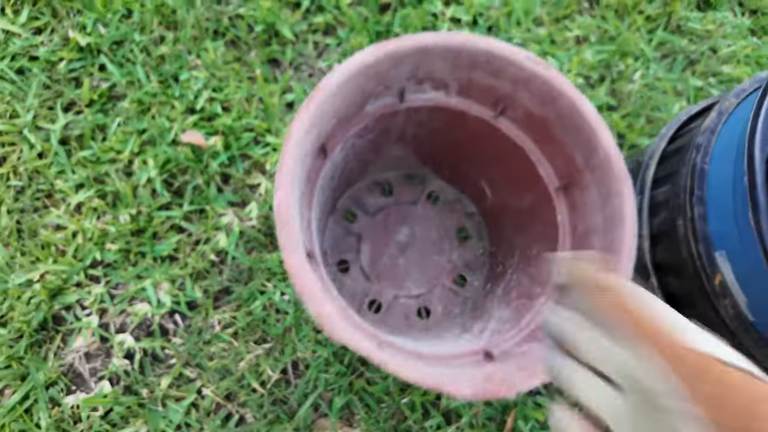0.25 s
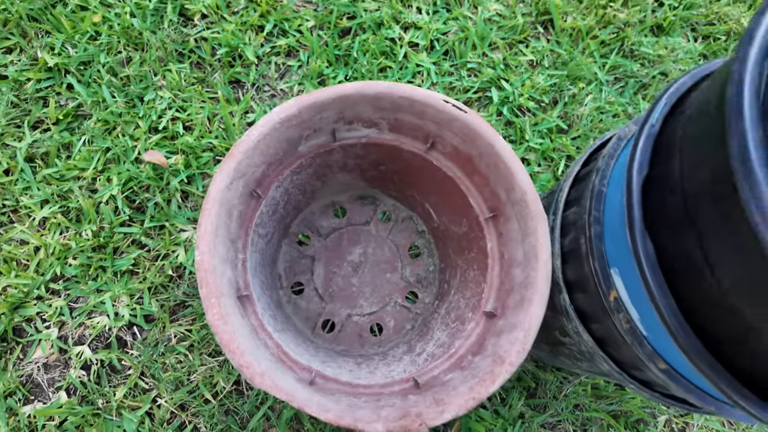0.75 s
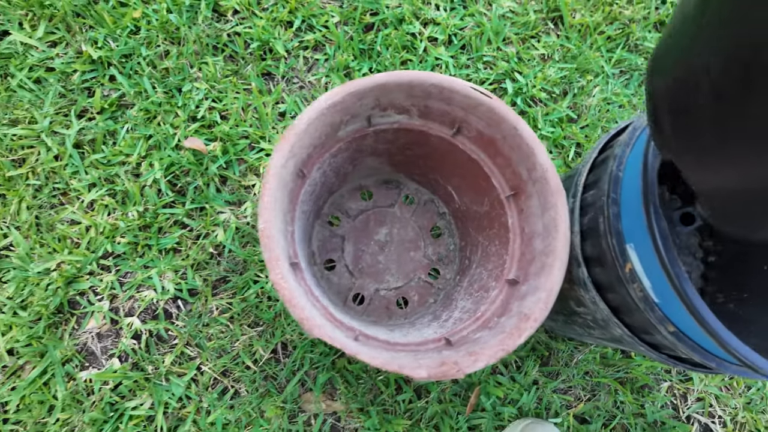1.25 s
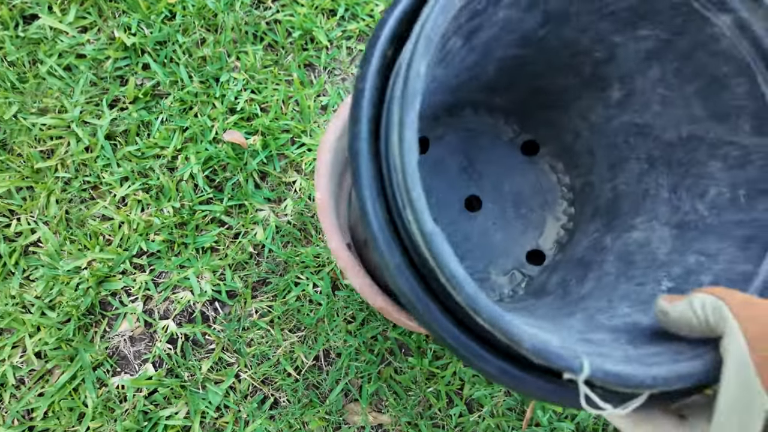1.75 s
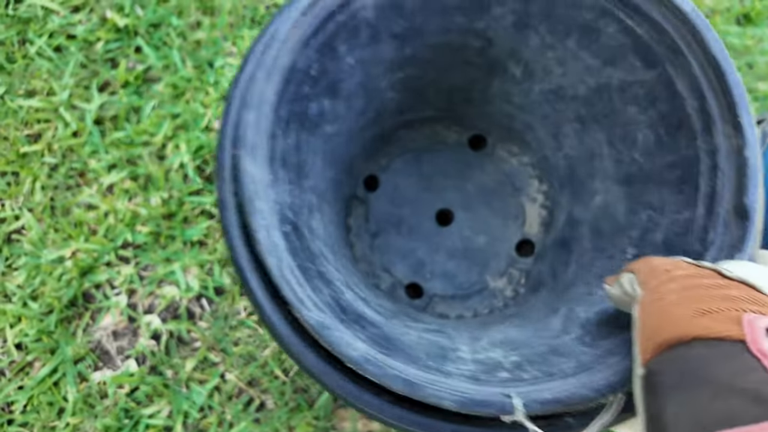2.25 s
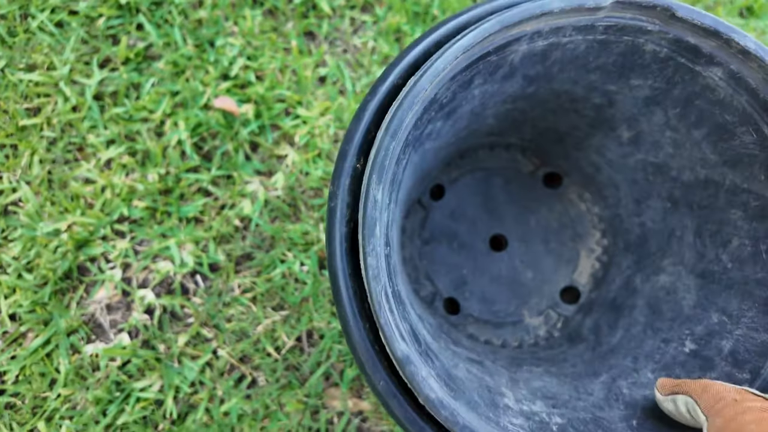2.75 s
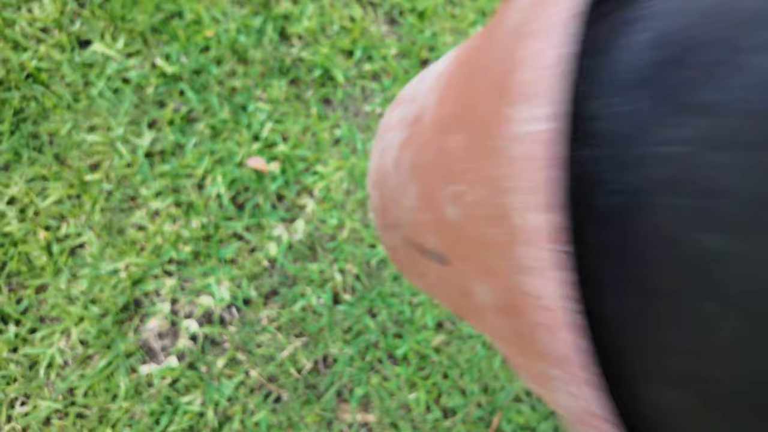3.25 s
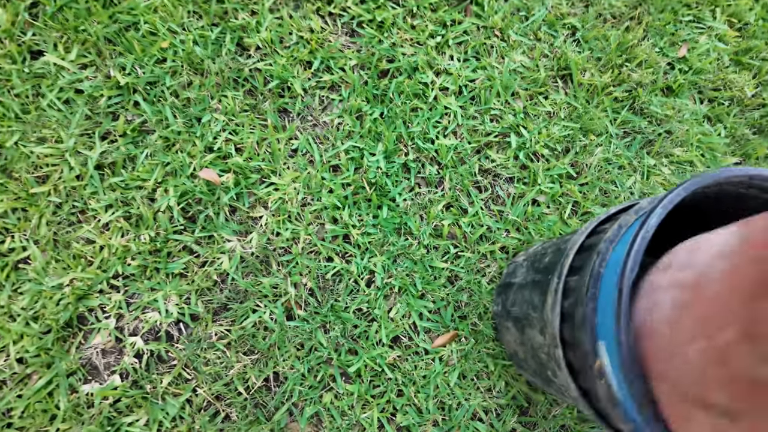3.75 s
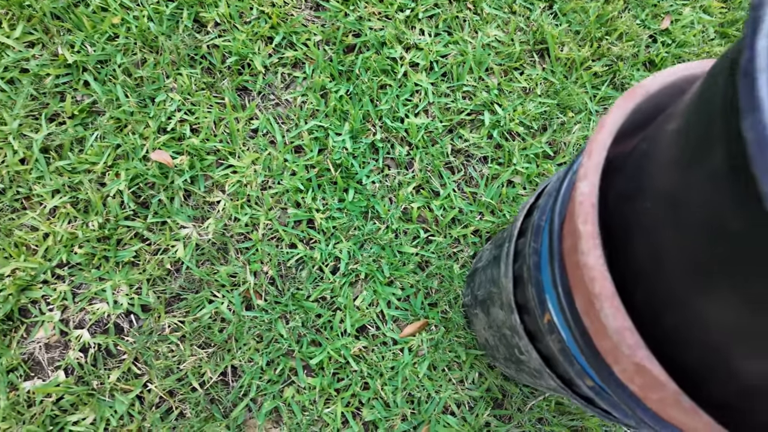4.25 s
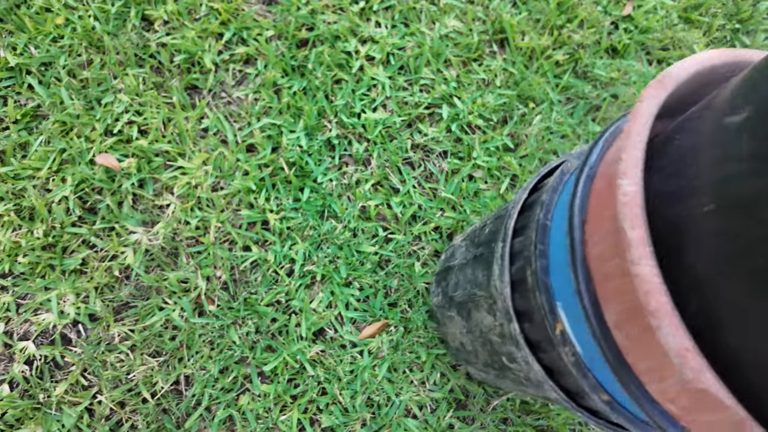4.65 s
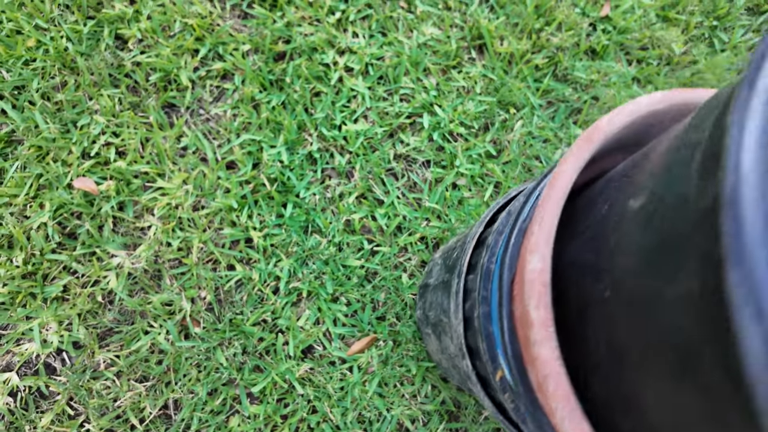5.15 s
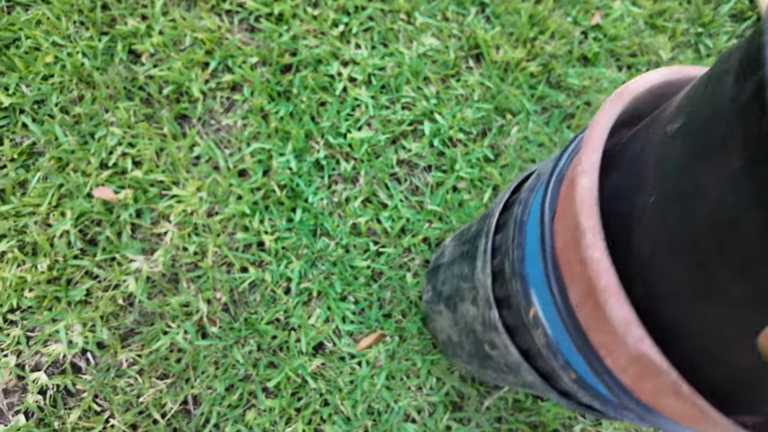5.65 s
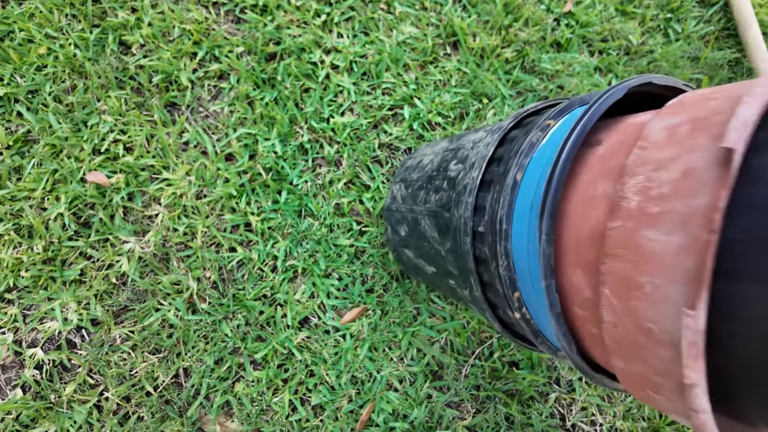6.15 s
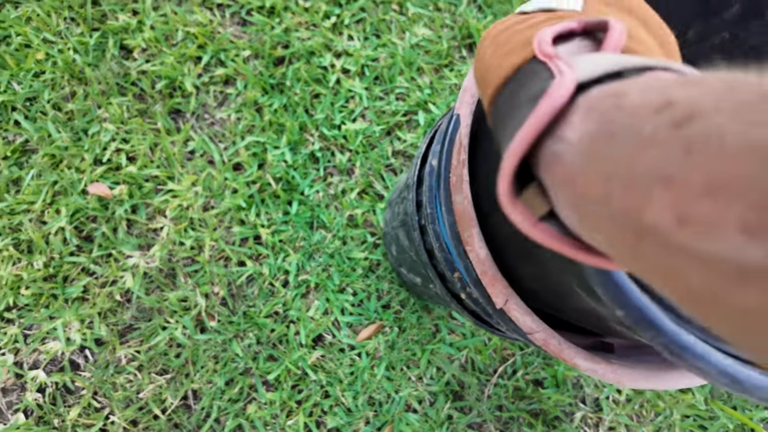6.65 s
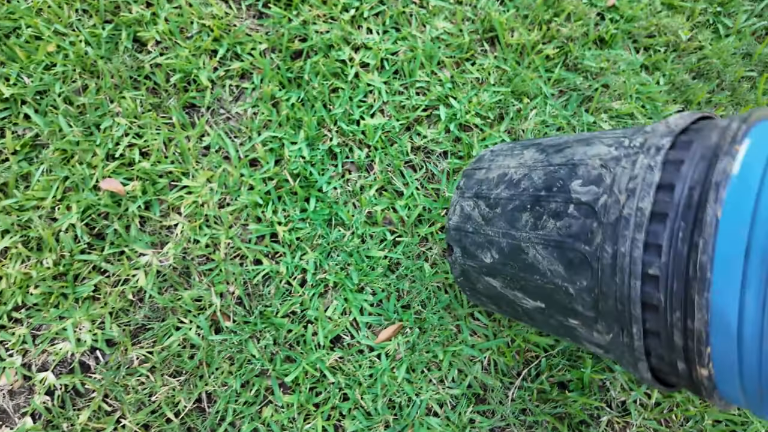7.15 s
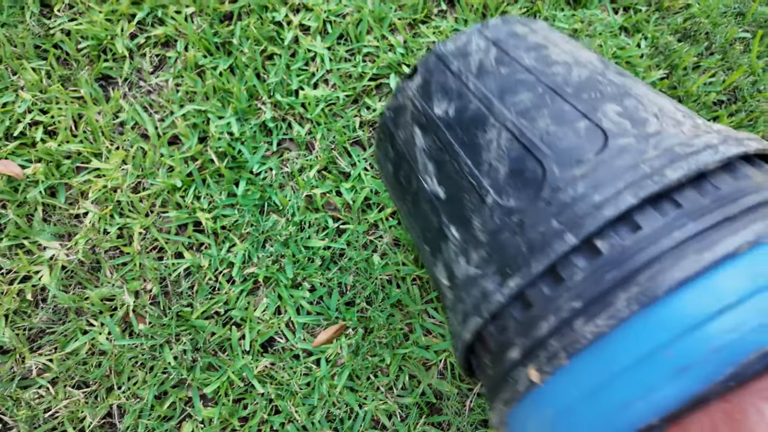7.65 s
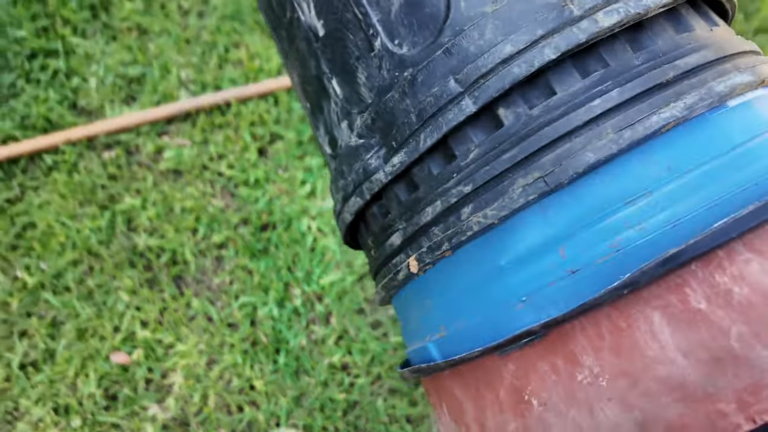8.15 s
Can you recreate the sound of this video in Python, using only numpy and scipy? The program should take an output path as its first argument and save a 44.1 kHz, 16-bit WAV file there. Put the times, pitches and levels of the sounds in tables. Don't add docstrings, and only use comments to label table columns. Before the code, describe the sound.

Close, hollow plastic clatter and gritty rubbing of flowerpots being stacked outdoors, then low wind thumps and light rim taps over a quiet hum.

```python
import sys
import numpy as np
from scipy import signal
from scipy.io import wavfile
from scipy.ndimage import uniform_filter1d

SR = 44100
rng = np.random.default_rng(int(sys.argv[2]) if len(sys.argv) > 2 else 0)


def wav_record(signal):
    frames = np.transpose(np.atleast_2d(signal))
    bounded = np.clip(frames, -1, 1)
    quanta = np.round(bounded * 32767).astype(np.int16)
    wavfile.write(sys.argv[1], SR, quanta)


def amplitude_ratio(level_db):
    exponent = np.asarray(level_db, float) / 20
    return 10 ** exponent


N = 370873
TIME = np.arange(N) / SR

# frequency in Hz, level in dB per Hz.
WALL_COLOUR = [(350, -11.5), (512, -6.5), (824, -2.5), (1060, -1.5), (1330, 0.5), (1970, -1), (3600, -7.5),
               (5300, -14), (7500, -21), (10500, -20), (15500, -26.5)]
BAND_EDGES_HZ = (400, 1000, 2300, 6000)
# time in seconds, rub in dB, dust hiss in dB re rub.
HANDLING = [(0, -56.5, -15.5), (.75, -60, -7), (1.34, -58.5, -11), (1.65, -64, -20), (2.12, -51, -12),
            (2.86, -64, -24), (3.5, -65.5, -26), (4.1, -60.5, 5), (4.36, -61, -5), (4.53, -59.5, -7.5),
            (5.2, -64.5, 1), (5.6, -59, -3), (5.9, -59.5, -8), (6.2, -56.5, -2), (6.75, -51, -11),
            (6.93, -74, 5), (7.3, -68, -8), (8.41, -58.5, 1.5)]
# start in seconds, length in seconds, first rub in dB,
# last rub in dB, dust hiss in dB re rub.
SLIDES = [(0.197, 0.032, -34, -40.5, -9.5), (0.808, 0.1, -44.5, -38, -5.5), (1.094, 0.079, -36, -40.5, -5),
          (1.41, 0.15, -55, -53, -5), (1.797, 0.071, -26, -38.5, -1.5), (1.977, 0.094, -46.5, -52, -5),
          (2.219, 0.018, -33, -34, -7), (2.264, 0.11, -39, -43, -6), (0.255, 0.068, -51.5, -52, -5.5),
          (0.353, 0.088, -49.5, -51.5, -7.5), (2.485, 0.076, -48, -51, -4.5),
          (2.683, 0.026, -46, -40.5, -12), (3.792, 0.022, -50.5, -50, -9), (7.556, 0.19, -58.5, -53, -2.5),
          (2.788, 0.049, -38.5, -49.5, -12), (2.913, 0.03, -54, -57, -19), (2.982, 0.022, -43.5, -42, -12),
          (3.602, 0.17, -59, -51, -7.5), (3.939, 0.048, -22.5, -28.5, -6.5), (3.957, 0.079, -36, -41, -4),
          (4.06, 0.11, -52, -53.5, -2.5), (4.26, 0.072, -56, -54, -5.5), (4.402, 0.077, -53.5, -47.5, -5.5),
          (4.864, 0.073, -61.5, -54.5, 3), (5.056, 0.047, -60.5, -56, -36), (5.262, 0.036, -44, -43, -6),
          (5.314, 0.025, -29.5, -36, -8.5), (5.365, 0.2, -46.5, -59.5, -7), (6, .14, -36.5, -41, -3.5),
          (6.508, 0.125, -40.5, -46, -2.5)]
# start in seconds, length in seconds, first rub in dB,
# last rub in dB, dust hiss in dB re rub.
SCUFFS = [(0.927, 0.08, -37, -35.5, -5.5), (1.016, 0.026, -36, -37, -7), (1.063, .02, -41, -50, 2),
          (7.778, 0.027, -46, -49, -16), (1.19, 0.014, -47, -43, -17), (1.697, 0.033, -24.5, -26, -11),
          (1.823, 0.041, -35.5, -35.5, 5), (2.714, 0.066, -29, -30.5, -10.5), (2.956, 0.02, -50, -48, -12),
          (3.841, 0.021, -28, -33, -9.5), (3.891, 0.019, -27.5, -22, 1.5), (6.263, 0.013, -33, -37, -2),
          (6.282, .02, -43, -43, -3), (6.299, 0.022, -39, -34.5, 0), (6.34, 0.034, -48, -48, -24)]
# start in seconds, rub in dB,
# scrape in seconds to fade, dust hiss in dB re rub.
JOLTS = [(0.317, -37.5, 0, -9), (0.568, -43, 0.24, -11.5), (1.227, -44.5, -0.2, -20),
         (1.695, -27.5, 0.0535, -2), (1.767, -21, 0.14, -10.5), (2.40, -49, 0.13, -6),
         (2.48, -45, -0.63, -3), (3.361, -57, -0.85, 0), (3.865, -36, 0, -2), (3.908, -19.5, 0.0677, -1),
         (6.32, -35.5, 0.13, -8), (6.783, -51.5, -0.5, -26), (7.833, -48, 0.04, -6), (6.97, -64, 1.4, 2.5),
         (7.649, -50, -0.8, -11), (8.15, -59, 1.1, 6), (8.227, -58, 0.6, -25)]
SLIDE_EDGE_S, SCUFF_EDGE_S, JOLT_RISE_S, PUFF_EDGE_S = 0.045, 0.0093, 0.0073, 0.02
# start in seconds, peak in dB, ringing in Hz, hollow wall in dB re peak,
# decay by 60 dB in seconds.
BLOWS = [(0.1619, -24, 1200, -27, 0.46), (0.3176, -26, 1260, -39, 0.26), (0.9298, -26.5, 1600, -23, 0.35),
         (1.0213, -20, 1730, -27, 0.062), (1.1892, -24, 1510, -17, 0.085), (1.694, -14.5, 1390, 4.5, 0.049),
         (1.7616, -7.5, 780, 1, 0.076), (1.7768, -9, 3650, 15, 0.015), (2.2144, -19, 960, -17, 0.11),
         (2.3413, -27, 2430, -29, 0.088), (2.7177, -16, 500, -15, 0.034), (2.9816, -36, 1750, -1, 0.037),
         (3.049, -33, 740, 17.5, 0.082), (3.705, -39, 1810, -5, 0.13), (3.836, -14, 2340, -7, 0.081),
         (3.907, -8, 1300, 4.5, 0.024), (3.917, -8, 1280, 4, 0.029), (3.9586, -10, 540, -25, 0.1),
         (5.2943, -22.5, 1360, 6, 0.12), (6.0115, -25, 1350, -2, 0.18), (6.318, -11.5, 1330, 5.5, 0.053),
         (6.5146, -26, 757, -27, 0.36), (0.8652, -33, 2040, -20, 0.12)]
# start in seconds, peak in dB, ringing in Hz,
# hollow wall in dB re peak.
TICKS = [(0.564, -40, 2580, 4), (1.083, -19.5, 1830, -23), (1.125, -19, 1340, -6), (1.231, -26, 1640, -2),
         (1.926, -33, 865, -21), (1.9801, -35, 2410, -6), (2.249, -20.5, 1660, -44),
         (2.377, -32, 1610, -35), (2.469, -29.5, 2740, -30), (2.811, -23, 600, 2), (3.002, -50, 2980, -10),
         (3.3575, -34.5, 3360, -27), (3.8931, -28, 3320, -22), (4.003, -17, 1450, -1.5),
         (4.061, -29, 1260, -15), (5.103, -40, 1300, 12), (5.414, -34.5, 4270, 1),
         (6.2637, -14.5, 950, -28), (6.415, -31.5, 1870, -22), (6.4684, -31.5, 1870, -12),
         (6.6694, -40.5, 3430, -23), (6.7372, -29, 1980, -35), (6.779, -30, 595, -16),
         (7.574, -41.5, 2640, -24), (7.686, -42.5, 4870, -22.5), (1.1743, -26.5, 1440, -24),
         (6.751, -44, 2640, -20), (5.089, -34, 1260, -10), (8.168, -38.5, 890, 8), (8.2229, -31, 2090, -6)]
TICK_T60_S = 0.032
# (frequency in Hz, width in Hz, level in dB).
GRIPPED_POTS = [(0, [(2570, 48, -15)]), (0.701, [(1320, 90, 8), (1730, 160, 2), (3640, 210, -8),
                (3920, 93, 1.5), (4630, 410, -11)]), (1.599, [(786, 140, -4), (1310, 130, -2),
                (4030, 810, -3.5), (10400, 1800, -30)]), (2.601, [(1310, 180, -29), (3550, 650, 0)]),
                (3.099, []), (3.602, [(1200, 460, -0.5), (2850, 95, -14), (3500, 210, -6),
                (12100, 870, -41)]), (4.2, [(2080, 200, 15.5), (1520, 150, -13), (3180, 220, -21)]),
                (4.52, []), (5.001, [(1250, 250, 10.5), (2620, 94, -19)]), (5.36, []),
                (5.8, [(1410, 85, -18), (3500, 550, -3), (4070, 230, -0.5)]), (7.4, [(2670, 160, 9),
                (5950, 180, -16), (10500, 800, -26)])]
# start in seconds, peak in dB, wall patch in Hz,
# decay by 60 dB in seconds.
SNAPS = [(1.001, -23, 1290, 0.048), (1.031, -32, 1700, .03), (1.097, -27, 3300, .02),
         (1.698, -17.5, 5300, 0.025), (1.787, -9, 1600, 0.026), (1.801, -15, 2500, 0.022),
         (1.907, -33, 2800, 0.026), (2.221, -30, 1500, 0.015), (2.229, -22, 3030, 0.022),
         (2.251, -19, 2500, 0.02), (2.274, -30, 9500, 0.028), (2.291, -27, 3000, .02),
         (2.31, -30, 3450, .03), (2.324, -27, 2000, .02), (2.493, -34, 2400, 0.034), (2.7, -39, 1460, 0.05),
         (2.982, -27, 3500, .02), (3.002, -37, 3000, 0.017), (3.039, -29, 890, 0.057),
         (3.357, -32, 6170, 0.018), (3.915, -9, 3500, 0.022), (3.92, -15, 2500, 0.021),
         (3.935, -12, 2500, .03), (3.959, -10.5, 3000, .03), (3.99, -18, 2380, 0.027),
         (5.199, -39.5, 12000, 0.033), (5.24, -35, 1300, .02), (5.316, -18, 1510, 0.021),
         (5.328, -27, 9000, 0.016), (5.415, -31.5, 10000, 0.015), (5.44, -47, 11000, 0.016),
         (5.981, -31, 1400, 0.046), (6.082, -42, 4800, .03), (6.102, -29, 3580, 0.068),
         (6.19, -42, 4250, .04), (6.205, -36.5, 4000, 0.027), (6.223, -37, 4000, 0.02),
         (6.27, -20.5, 4300, 0.028), (6.328, -8, 2040, 0.03), (6.365, -32, 1500, .04),
         (6.56, -35, 1400, 0.027), (6.592, -42, 2220, 0.022), (6.67, -36, 5440, 0.018),
         (6.726, -40, 5500, 0.017), (6.763, -51, 12000, .02), (7.56, -45, 2800, 0.049),
         (7.649, -38, 2620, 0.027), (7.687, -34, 5570, 0.015), (7.71, -46, 2500, 0.042),
         (7.859, -44, 4000, 0.022)]
# start in seconds, peak in dB.
TAPS = [
    (7.751, -30),
    (7.778, -28.5),
    (7.794, -32),
    (7.831, -22),
    (7.882, -35),
]
# frequency in Hz, level in dB, decay by 60 dB in seconds.
RIM_MODES = [(608, -0.5, 0.047), (1192, -3.5, 0.047), (1840, -7.5, 0.035), (2654, -9, 0.027),
             (3580, -7.5, 0.012)]
# start in seconds, peak in dB, frequency in Hz,
# decay by 60 dB in seconds.
THUDS = [(1.696, -20.5, 140, 0.36), (1.763, -8, 312, 0.11), (1.7794, -8.5, 310, 0.13),
         (1.807, -6.5, 283, 0.1), (1.775, -4.5, 155, 0.064), (1.783, -17, 820, 0.09),
         (1.772, -17.5, 597, .12), (1.838, -26, 280, 0.056), (3.908, -17, 790, 0.067),
         (3.92, -17, 162, 0.088), (3.85, -21, 270, 0.051), (3.908, -14, 306, 0.078),
         (6.268, -28.5, 890, .07), (6.364, -22, 171, 0.063), (2.21, -17.5, 252, 0.052),
         (3.901, -15.5, 94, 0.15), (3.96, -9.5, 267.4, 0.14), (4.97, -19, 95, 0.051), (5, -20, 109, 0.035),
         (6.265, -23, 130, 0.064), (6.33, -11, 268.5, 0.093), (6.329, -7, 129, 0.087),
         (7.159, -18.5, 101, 0.049), (7.185, -17, 77.5, 0.071), (7.228, -10.5, 76, 0.023),
         (7.38, -18.5, 92, 0.056), (7.439, -21, 72.7, 0.057), (7.523, -23, 86.5, 0.077)]
# start in seconds, length in seconds, first level in dB,
# last level in dB, cavity pitch in Hz.
PUFFS = [(1.005, 0.26, -38, -44.5, 187), (1.71, 0.045, -22.5, -31, 255), (1.783, 0.087, -14, -30, 267),
         (1.82, 0.019, -24, -36, 260), (2.205, 0.17, -34, -41, 239), (2.717, .11, -31, -35.5, 250),
         (2.987, 0.092, -38, -44, 230), (3.695, 0.093, -43, -27.5, 108), (3.846, 0.034, -24.5, -37, 253),
         (3.92, 0.055, -19, -18, 140), (3.961, 0.067, -17.5, -36, 250), (4.974, 0.066, -41, -44, 102),
         (5.087, 0.04, -38, -43, 88.7), (5.278, 0.061, -35.5, -28, 220), (5.713, 0.021, -41, -56, 290),
         (5.97, 0.093, -39, -37, 153), (6.278, 0.019, -27, -39, 140), (6.327, 0.048, -19.5, -30, 161),
         (6.501, 0.14, -37, -47, 220), (6.67, 0.22, -49, -40, 69.6), (7.113, 0.25, -37.5, -39.5, 78),
         (7.377, 0.2, -35.5, -48, 93), (8.056, 0.15, -51, -50, 273)]
BREEZE_DB, BREEZE_HZ = -61, 108
# frequency in Hz, width in Hz, level in dB.
STACK_CAVITY = [(140, 58, -4.5), (285, 14.6, 2.5)]
# (frequency in Hz, level in dB).
STRAP_SQUEAK = (7.125, .12, [(3610, -70), (8920, -71), (10700, -76), (12500, -73)])
# start in seconds, length in seconds, first, middle, last pitch in Hz.
WHISTLES = [(.02, .055, 3700, 3600, 2450), (.06, .035, 3800, 4100, 3800), (.105, .05, 2800, 3700, 3700),
            (1.355, .075, 3800, 2600, 2950), (3.17, .032, 2550, 3150, 3200),
            (3.236, .016, 4600, 4300, 2800), (3.266, .03, 3500, 3600, 2600), (3.3, .026, 2700, 4050, 3200),
            (3.205, .03, 6300, 5600, 4800), (3.205, .04, 3100, 3100, 3100), (3.41, .025, 6100, 5600, 4700),
            (7.333, .025, 4300, 4200, 3700), (3.368, .078, 2800, 3120, 2950),
            (3.434, .018, 4500, 4250, 2800), (3.447, .02, 3200, 4300, 4350),
            (3.465, .032, 4350, 3700, 2850), (3.57, .03, 2750, 2900, 3050), (4.23, .058, 3850, 4080, 4300),
            (4.64, .062, 3600, 4170, 4250), (4.865, .06, 3650, 4080, 4250), (5.08, .085, 3250, 4050, 4230),
            (5.585, .1, 4000, 4350, 4330)]
WHISTLE_ACCENT_DB = [0, 0, -2, 0, 3, 2, 2, 3, -7, -4, -5, 0, -1, 1, 4, 1, -1, -1, -2, -1, 0, -3]
WHISTLE_DB, HIGH_LOSS_DB = -64, 5
# frequency in Hz, level in dB per Hz.
HUM_COLOUR = [(40, -26), (65, 10.5), (120, 2), (249, -3.5), (427, -20), (863, -14), (1330, -17),
              (1480, -19.5), (4140, -36), (6500, -41), (16000, -45.5)]
HUM_DB = -47
# time in seconds, level in dB.
TRAFFIC = [(0, -0.5), (.7, 1.5), (1.5, 1.5), (2.4, 3), (3.1, -1.5), (3.5, -1.5), (4.0, 0), (4.7, 0.5),
           (5.3, 2), (5.75, -1.5), (6.3, 1.5), (6.9, -1), (7.8, -2), (8.41, -2)]
# frequency in Hz, width in Hz, share removed.
GROUND_DIP = (1050, 240, .65)
MIC_EDGES_HZ = (50, 15900)


def evened(x):
    return x / np.sqrt(np.mean(x ** 2) + 1e-20)


def read(points, hz):
    f, value = np.transpose(points)
    return np.interp(np.log(hz + 1), np.log(f + 1), value)


def played(rows, t=TIME):
    s, *columns = np.transpose(rows)
    return [np.interp(t, s, c) for c in columns]


def add(mix, s, sound):
    part = mix[..., round(s * SR):][..., :sound.shape[-1]]
    part += sound[..., :part.shape[-1]]


def resonate(x, hz, width):
    turn = np.exp(2j * np.pi * np.cumsum(hz * np.ones(len(x))) / SR)
    r = np.exp(-np.pi * width / SR)
    return 2 * (turn * signal.lfilter([1 - r], [1, -r], x / turn)).real


def flicker(seconds, count=N):
    span = max(int(seconds * SR), 2)
    return evened(uniform_filter1d(uniform_filter1d(rng.standard_normal(count), span), span))


def random_grains(per_s, spread_db, most):
    size = amplitude_ratio(spread_db * np.minimum(rng.exponential(1, N), most))
    return size * (rng.random(N) < per_s / SR)


def swells(rows, base_db, base_value):
    t = TIME[::32, None]
    s, length, first_db, last_db, value, rise, fall = np.transpose(rows)
    run_db = first_db + (last_db - first_db) * np.clip((t - s) / length.clip(1e-3), 0, 1)
    outside = np.maximum(np.maximum((s - t) / rise, (t - s - length) / fall), 0)
    power = amplitude_ratio(2 * (run_db - 20 * outside))
    base = amplitude_ratio(2 * (base_db + 0 * TIME)[::32])
    total = base + power.sum(1)
    mixed = (base * (base_value + 0 * TIME)[::32] + power @ value) / total
    return played(np.transpose([t[:, 0], 10 * np.log10(total), mixed]))


def walls():
    strokes = [(*row, SLIDE_EDGE_S, SLIDE_EDGE_S) for row in SLIDES]
    strokes += [(*row, SCUFF_EDGE_S, SCUFF_EDGE_S) for row in SCUFFS]
    strokes += [(s, fade, db, db - 22, hiss, JOLT_RISE_S, SLIDE_EDGE_S) for s, db, fade, hiss in JOLTS]
    rub_db, hiss_db = swells(strokes, *played(HANDLING))
    dry_db = 0.49 * (hiss_db + 8.5)
    slip_db = 1.3 * flicker(0.0052) + 1.7 * np.array([flicker(0.0074) for _ in BAND_EDGES_HZ])
    band_db = np.array([-4 - dry_db, -7.5 - dry_db, dry_db - 7, hiss_db])
    drive = grit() * amplitude_ratio(rub_db - 3.5 + slip_db + band_db)
    rings = knocks(drive)
    coloured = signal.oaconvolve(drive, wall_responses(), axes=1)[:, :N].sum(0)
    return coloured + bending(drive[1] + drive[2]) + rings + crackle(rub_db)


def grit(per_s=2500, spread_db=3.0, share=0.41):
    grains = random_grains(per_s, spread_db, 5) * rng.choice([-1., 1.], N)
    return np.sqrt(share) * evened(grains) + np.sqrt(1 - share) * rng.standard_normal(N)


def knocks(drive):
    rings, t = np.zeros(N), TIME[:4000]
    for s, peak_db, hz, hollow_db, t60 in BLOWS + [(*tick, TICK_T60_S) for tick in TICKS]:
        shape = amplitude_ratio(peak_db - 60 * t / np.clip(t60, .008, .15)) * (1 - np.exp(-t / (0.0079 * t60)))
        blow = shape * rng.standard_normal(len(t)) + amplitude_ratio(peak_db + 14.5) * (t == 0)
        hard_db = 4 * np.log2(hz / 1700)
        band_db = np.array([[hollow_db], [-3 - hard_db], [hard_db + 0.5], [hard_db - 39]])
        add(drive, s, blow * amplitude_ratio(band_db - 15))
        add(rings, s, amplitude_ratio(10.5) * resonate(blow, hz, 60 + 0.05 * hz))
    return rings


def wall_responses(size=4096):
    hz = abs(np.fft.fftfreq(size, 1 / SR))
    below = np.array([1 / (1 + (hz / edge) ** 12) for edge in BAND_EDGES_HZ] + [hz ** 0])
    shares = (1 - below[:-1]) * below[1:]
    log_gain = np.log(amplitude_ratio(read(WALL_COLOUR, hz)) * np.sqrt(shares) + 1e-5)
    response = np.fft.ifft(np.exp(np.conj(signal.hilbert(log_gain)))).real[:, :size // 2]
    return response / np.linalg.norm(response, axis=1, keepdims=True)


def bending(force, ring_db=5, patchy_db=4, wander=0.013):
    out = np.zeros(N)
    ends = [s for s, _ in GRIPPED_POTS[1:]] + [N / SR]
    for (s, modes), end in zip(GRIPPED_POTS, ends):
        part = force[round(s * SR):round(end * SR)]
        for hz, width, db in modes:
            grip = amplitude_ratio(db + ring_db + patchy_db * flicker(0.029, len(part)))
            pitch = hz * (1 + wander * flicker(0.2, len(part)))
            damped = max(width, hz / 14)
            add(out, s, resonate(grip * part, pitch, damped))
    return out


def crackle(rub_db, low_hz=1200, high_hz=9000, cycles=45, count=12):
    hz, t = np.geomspace(low_hz, high_hz, count)[:, None], TIME[:1200]
    force = evened(random_grains(900, 3, 3.5)) * amplitude_ratio(rub_db - 1.5)
    trains = force * (rng.integers(0, count, N) == np.arange(count)[:, None])
    decay_db = 60 * t * np.sqrt(hz * low_hz) / cycles
    patch = amplitude_ratio(read(WALL_COLOUR, hz) - decay_db) * np.sin(2 * np.pi * hz * t)
    return signal.oaconvolve(trains, patch / np.linalg.norm(patch[0]), axes=1)[:, :N].sum(0)


def snaps():
    out, t = np.zeros(N), TIME[:2000]
    for s, peak_db, hz, t60 in SNAPS:
        width = 0.72 * hz
        patch = evened(resonate(resonate(rng.standard_normal(len(t)), hz, width), hz, width))
        decay = amplitude_ratio(peak_db - 4.5 - 60 * t / np.clip(t60, .006, .08))
        add(out, s, decay * (1 - np.exp(-t / 0.00083)) * patch)
    return out


def booms():
    level_db, hz = swells([(*row, PUFF_EDGE_S, PUFF_EDGE_S) for row in PUFFS], BREEZE_DB, BREEZE_HZ)
    push = rng.standard_normal(N) * amplitude_ratio(2.3 * flicker(0.0045))
    moving = evened(resonate(resonate(push, hz, 63), hz, 170))
    stack = evened(sum(amplitude_ratio(db) * resonate(resonate(push, f, w), f, 3 * w) for f, w, db in STACK_CAVITY))
    seated = np.clip((hz - 110) / 120, 0, 1)
    out = amplitude_ratio(level_db + 2) * (0.5 * moving + 0.5 * seated * stack)
    t = TIME[:8000]
    for s, peak_db, f, t60 in THUDS:
        shape = amplitude_ratio(peak_db + 1 - 60 * t / max(t60, .01)) * (1 - np.exp(-t / 0.0033))
        add(out, s, shape * np.sin(2 * np.pi * f * t))
    return out


def taps():
    out, t = np.zeros(N), TIME[:3000]
    hz, db, t60 = np.transpose(RIM_MODES)[..., None]
    for s, peak_db in TAPS:
        level_luck, pitch_luck = rng.standard_normal((2, len(RIM_MODES), 1))
        decay = amplitude_ratio(peak_db - 4 + db + 2.5 * level_luck - 80 * t / t60)
        modes = decay * np.sin(2 * np.pi * hz * (1 + .03 * pitch_luck) * t)
        modes = modes * (1 + .4 * flicker(.0004, len(t)))
        add(out, s, modes.sum(0) * (1 - np.exp(-t / 0.00072)))
    return out


def squeak():
    s, length, partials = STRAP_SQUEAK
    out, rub = np.zeros(N), rng.standard_normal(round(length * SR))
    tone = sum(amplitude_ratio(db) * evened(resonate(resonate(rub, hz, 220), hz, 300)) for hz, db in partials)
    add(out, s, tone * signal.windows.tukey(len(rub), .8))
    return out


def bird():
    out = np.zeros(N)
    for (s, length, *glide), accent_db in zip(WHISTLES, WHISTLE_ACCENT_DB):
        t = np.arange(0, length, 1 / SR)
        hz = uniform_filter1d(np.interp(t / length, [0, .5, 1], glide), 300)
        level_db = WHISTLE_DB + accent_db - HIGH_LOSS_DB * np.maximum(hz / 1000 - 4.4, 0)
        tone = np.sin(2 * np.pi * np.cumsum(hz) / SR)
        add(out, s, amplitude_ratio(level_db) * tone * signal.windows.tukey(len(t), .4))
    echo = rng.standard_normal(5000) * amplitude_ratio(-60 * TIME[:5000] / 0.42)
    return out + 2 / 3 * signal.oaconvolve(out, echo / np.linalg.norm(echo))[:N]


def hum():
    frames, hz = N // 256 + 5, np.fft.rfftfreq(1024, 1 / SR)
    a, b, patches = rng.standard_normal((frames, 513, 3)).T
    patches = evened(uniform_filter1d(uniform_filter1d(patches, 12, 0), 14, 1))
    spectra = (a + 1j * b) * amplitude_ratio(read(HUM_COLOUR, hz)[:, None] + 1.8 * patches)
    noise = signal.istft(spectra, nperseg=1024, noverlap=768)[1][:N]
    return amplitude_ratio(HUM_DB + played(TRAFFIC)[0]) * evened(noise)


def scene():
    near = walls() + snaps()
    hz, width, share = GROUND_DIP
    cancelled = share * signal.lfilter(*signal.iirpeak(hz, hz / width, SR), near)
    return (near - cancelled + booms() + taps() + squeak() + bird() + hum())[None]


def band_limit(x):
    return signal.sosfilt(signal.butter(12, 16820, fs=SR, output="sos"), x)


def record(dry):
    low_hz, high_hz = MIC_EDGES_HZ
    cut = signal.sosfilt(signal.butter(3, low_hz, "high", fs=SR, output="sos"), dry)
    cut = 1.5 * np.tanh(cut / 1.5)
    cut = signal.oaconvolve(cut, signal.firwin(255, high_hz, fs=SR)[None], "same")
    return band_limit(cut)


dry = scene()
out = record(dry)
wav_record(out)
```